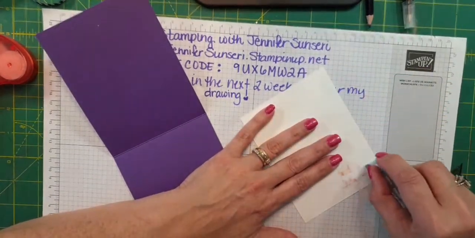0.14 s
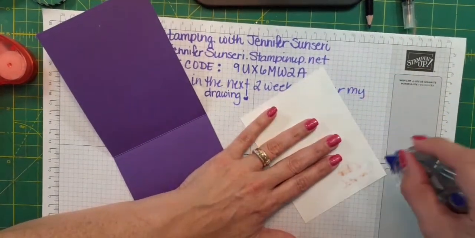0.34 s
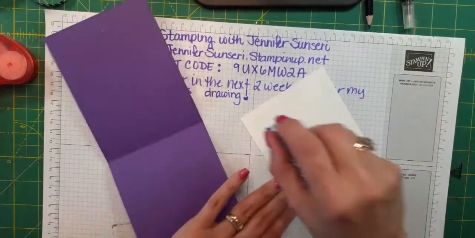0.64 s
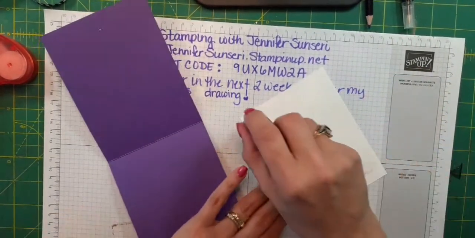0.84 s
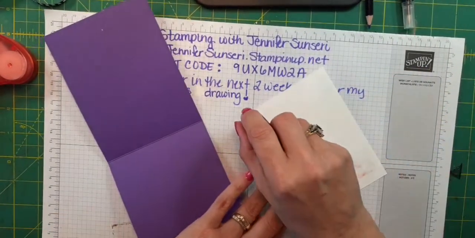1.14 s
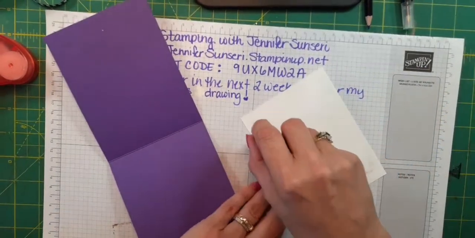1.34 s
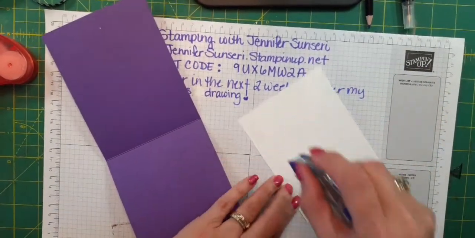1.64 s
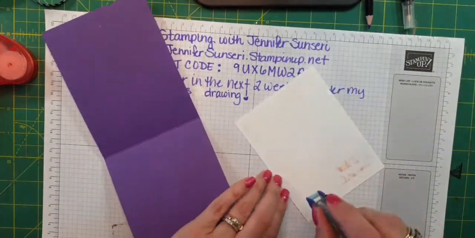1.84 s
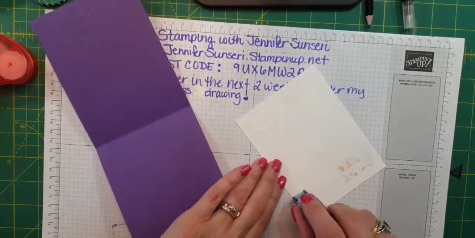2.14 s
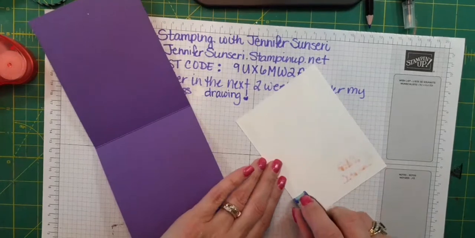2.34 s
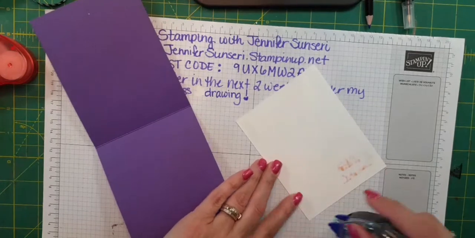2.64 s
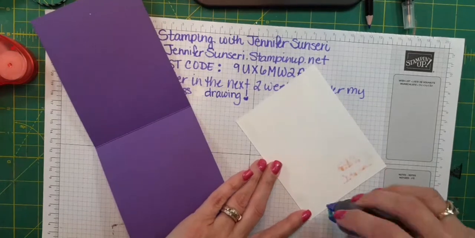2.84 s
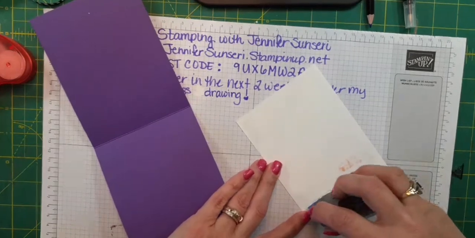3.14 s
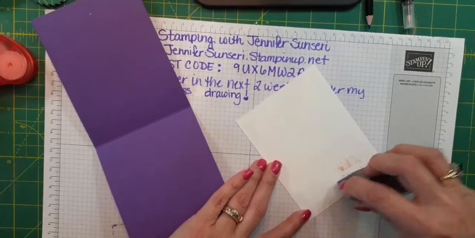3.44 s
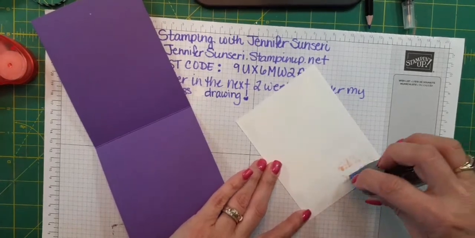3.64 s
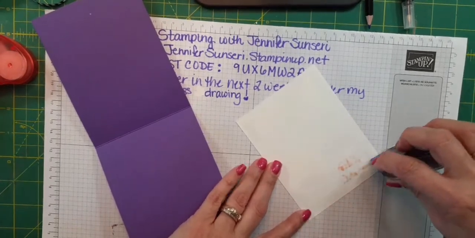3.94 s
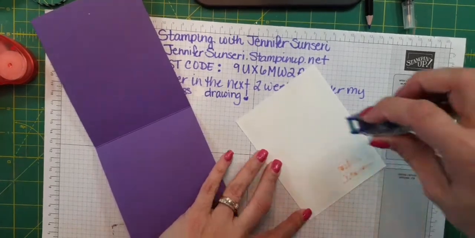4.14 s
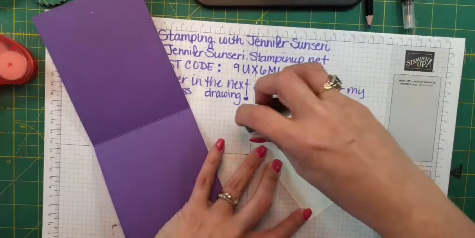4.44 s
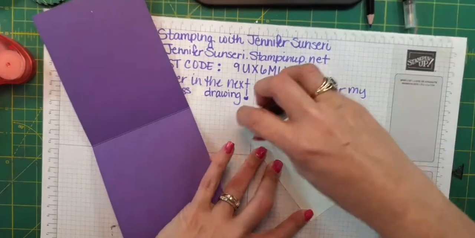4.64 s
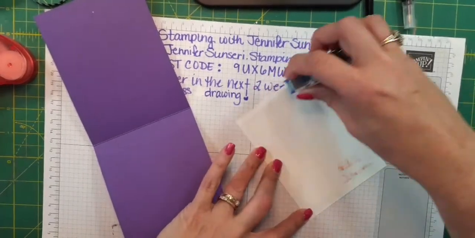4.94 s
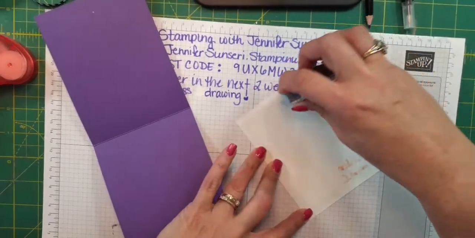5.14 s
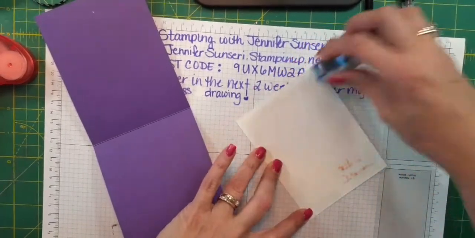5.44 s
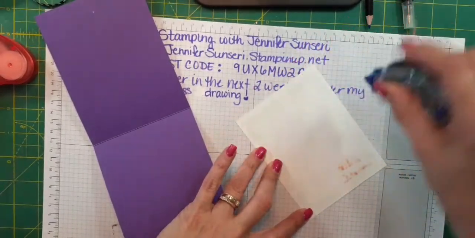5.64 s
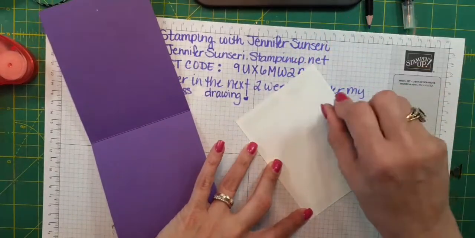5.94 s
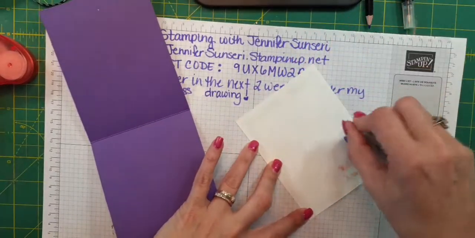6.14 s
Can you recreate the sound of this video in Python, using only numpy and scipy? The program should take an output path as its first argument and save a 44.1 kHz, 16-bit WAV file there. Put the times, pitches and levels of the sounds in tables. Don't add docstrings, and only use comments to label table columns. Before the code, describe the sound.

Quick rattling bursts of tiny plastic teeth, each about a tenth of a second, repeat eight times as a tape tool is dragged over card. Single bright snaps and papery scuffs fill the gaps; later strokes are preceded by clattery little knocks and dull desk thuds. The stereo microphones are close, with tight reflections off the tabletop and little room tail, over soft air noise and a low motor hum.

```python
import sys
import numpy as np
from scipy import signal
from scipy.fft import rfft, irfft
from scipy.io import wavfile
from scipy.ndimage import uniform_filter1d

SR = 44100
rng = np.random.default_rng(int(sys.argv[2]) if len(sys.argv) > 2 else 0)


def log_audio(samples):
    frames = np.atleast_2d(samples).T
    limited = np.clip(frames, -1, 1)
    pcm = np.round(limited * 32767).astype(np.int16)
    wavfile.write(sys.argv[1], SR, pcm)


def amplitude_ratio(level_db):
    exponent = np.asarray(level_db, float) / 20
    return 10 ** exponent


N = 277389


def steep(x, hz, kind):
    return signal.sosfilt(signal.butter(3, hz, kind, fs=SR, output="sos"), x)


def rms_one(x):
    return x / np.sqrt(np.mean(x ** 2) + 1e-20)


def at_hz(points, hz):
    point_hz, value = np.array(points).T
    return np.interp(np.log(hz + 1), np.log(point_hz), value)


def wander(per_s):
    return np.interp(np.arange(N) / SR * per_s, np.arange(400), rng.standard_normal(400))


def body(x, modes):
    out, power = 0, 0
    for k, (hz, width_hz, db) in enumerate(modes):
        r = np.exp(-np.pi * width_hz / SR)
        a = [1, -2 * r * np.cos(2 * np.pi * hz / SR), r * r]
        b = np.array([1, 0, -1]) * (1 - r * r) / 2
        out = out + (-1) ** k * amplitude_ratio(db) * signal.lfilter(b, a, x + 1e-18)
        power += amplitude_ratio(db) ** 2 * (1 - r * r) / 2
    return out / np.sqrt(power)


# time_s, lead_samples
PORT_LEAD = [(0, 4), (1, -2), (4.7, -1), (5.1, 3)]


def pair(alike, spread_db):
    grain_db = spread_db * np.minimum(rng.exponential(1, N), 3)
    shared, *own = rng.standard_normal((3, N)) * amplitude_ratio(grain_db)
    alike = np.clip(alike, 0, 1)
    n = np.arange(N)
    lead = np.round(np.interp(n / SR, *np.transpose(PORT_LEAD))).astype(int)
    shifted = shared[np.clip(n + lead, 0, N - 1)]
    return rms_one(np.sqrt(alike) * np.array([shared, shifted]) + np.sqrt(1 - alike) * np.array(own))


def crackle(alike, modes, even_s):
    x = body(pair(alike, 0.3), modes)
    return x / np.sqrt(uniform_filter1d(x ** 2, int(even_s * SR)) + 1e-3)


def bursts(s, db, pan_db, rise_s, fall_s):
    marks = np.zeros((2, N))
    at = np.round(s * SR).astype(int)
    np.add.at(marks, (slice(None), at), amplitude_ratio(db + np.outer([0.5, -0.5], pan_db)))
    for tau in (rise_s, fall_s):
        marks = signal.lfilter([1], [1, -np.exp(-1 / (tau * SR))], marks + 1e-18)
    return marks / (rise_s * SR)


# freq_hz, density_db_per_hz
AIR_SPECTRUM = [(20, -50), (40, -71), (80, -18.5), (150, -21), (220, -19.5), (320, -29.5), (600, -31),
                (800, -42), (1250, -37), (2000, -47), (3500, -53.5), (7000, -55), (9500, -61.5),
                (14000, -54.5)]
# centre_hz, width_hz, level_db
DUCT_LINES = [(59, 7.4, -75), (104.3, 33, -61.5), (136.3, 107, -57)]
# freq_hz, likeness_0_to_1
AIR_LIKENESS = [(100, 0.91), (300, 0.77), (700, 0.19), (1500, 0), (5000, 0.012)]


def air():
    hz = np.arange(N // 2 + 1) * SR / N
    mid, side = rfft(rng.standard_normal((2, N)))
    broad = amplitude_ratio(at_hz(AIR_SPECTRUM, hz))
    power = (broad / np.sqrt(np.mean(broad ** 2)) * amplitude_ratio(-60.5)) ** 2
    for centre_hz, width_hz, db in DUCT_LINES:
        line = 1 / (1 + (2 * (hz - centre_hz) / width_hz) ** 2) ** 2
        power = power + line / np.mean(line) * amplitude_ratio(db) ** 2
    alike = np.clip(at_hz(AIR_LIKENESS, hz), 0, 1)
    both = np.sqrt((1 + alike) / 2) * mid + np.sqrt((1 - alike) / 2) * side * [[1], [-1]]
    return irfft(both * np.sqrt(power), N) * amplitude_ratio([[0.7], [-0.7]])


# time_s, level_db
AIR_FLOW = [
    (0, 4),
    (.35, -12),
    (.6, 0.5),
    (1.2, 0.5),
    (2.3, 1),
    (2.6, -1),
    (4, 2.5),
    (4.5, -4),
    (5.4, -5),
    (6.29, 2),
]


def drone():
    motor_hz, motor_db = 120, -52.5
    duct_hz, duct_width_hz, duct_db = 126, 20, -52.5
    t = np.arange(N) / SR
    duct = body(rng.standard_normal(N + SR), [(duct_hz, duct_width_hz, 0)])
    duct = body(duct, [(duct_hz, 1.01 * duct_width_hz, 0)])
    duct = rms_one(duct[SR:])
    motor = amplitude_ratio(motor_db) * np.sin(2 * np.pi * motor_hz * t)
    flow_db = np.interp(t, *np.transpose(AIR_FLOW))
    return (motor + amplitude_ratio(duct_db) * duct) * amplitude_ratio(flow_db + [[0.7], [-0.7]])


# start_s, level_db
LANDINGS = [
    (2.149, -55),
    (3.04, -51),
    (3.627, -49),
    (4.441, -52.5),
    (5.055, -46.5),
    (5.959, -50.5),
]
# freq_hz, level_db, t60_s
DESK_TOP_MODES = [(50.1, 4.5, .4), (119, 6.5, 0.32), (275, 0, 0.19)]


def thumps():
    t, out = np.arange(N) / SR, np.zeros(N)
    for s, db in LANDINGS:
        u = np.clip(t - s, 0, None)
        for hz, mode_db, t60_s in DESK_TOP_MODES:
            swing = np.sin(2 * np.pi * hz * u) * (1 - np.exp(-u * hz / 2))
            out += amplitude_ratio(db + mode_db - 60 * u / t60_s) * swing
    return out


# start_s, length_s, centre_hz, mid_db, fizz_db
SLIDES = [(0.111, 0.07, 5000, -70, -66), (0.168, 0.35, 5000, -74.5, -86), (0.326, 0.061, 6500, -70.5, -66),
          (0.4, 0.079, 7100, -65, -69), (0.673, 0.076, 5750, -79.5, -94), (1.318, 0.085, 6000, -73, -67),
          (1.545, 0.1, 6050, -74, -72), (1.764, 0.22, 5960, -79, -87), (1.907, 0.052, 6500, -76, -89),
          (2.62, 0.14, 2150, -72.5, -81), (2.644, 0.17, 4030, -72, -79), (2.819, .08, 5200, -74.5, -89),
          (3.03, 0.095, 2950, -79, -81), (3.61, 0.36, 2900, -69.5, -75), (3.86, 0.13, 5000, -69.5, -75),
          (3.94, 0.23, 5200, -76.5, -94), (5.365, 0.082, 3270, -74.5, -81),
          (5.494, 0.059, 2370, -66.5, -69), (5.569, 0.079, 3020, -68.5, -66), (5.861, 0.1, 2750, -60, -89),
          (6.106, 0.12, 6000, -87, -95), (6.251, .045, 6500, -77.5, -89)]
# freq_hz, width_hz, level_db
FIZZ_MODES = [(11610, 3430, -4.5), (12600, 1500, 1.5), (14350, 1600, -3.5)]


def rustle():
    out, catch = np.zeros((2, N)), amplitude_ratio(4.3 * wander(60))
    grain = catch * pair(0.28, 2.0)
    fizz = catch * steep(body(pair(0.42, 3.2), FIZZ_MODES), 7800, "high")
    for s, length_s, hz, mid_db, fizz_db in SLIDES:
        now = slice(round(s * SR), min(N, round((s + 1.46 * length_s) * SR)))
        along = np.linspace(0, 1, now.stop - now.start)
        swell = np.sin(np.pi * along ** 0.52) ** 1.47
        mid = body(grain[:, now], [(hz, 0.64 * hz, 0), (6.0 * hz, 1.11 * hz, -12.0)])
        mid = steep(mid, min(2.2 * hz, 16000), "low")
        out[:, now] += swell * (amplitude_ratio(mid_db + 3.0) * mid + amplitude_ratio(fizz_db + 6.5) * fizz[:, now])
    return out


# start_s, snap_db, shell_rel_db
NOSE_KNOCKS = [(3.04, -60.5, 7), (3.619, -68.5, 14.5), (3.633, -56, 6), (4.433, -63.5, 14),
               (4.441, -45.5, 9), (4.453, -41.5, 8.5), (4.538, -51.5, 11.5), (4.551, -46, 2),
               (5.057, -58, 14.5), (5.063, -46.5, 9), (5.07, -41, 8.5), (5.083, -49, 9), (5.109, -55.5, 15),
               (5.117, -47.5, 1), (5.469, -71, 3), (5.791, -58.5, 10), (5.801, -48, -2), (5.812, -45.5, 0),
               (5.823, -46, 8), (5.877, -52.5, 10), (5.89, -51.5, 8.5)]
# start_s, snap_db, fizz_rel_db, strongest_ring_hz
BRIGHT_FLICKS = [(0.052, -44, -4, 4500), (0.568, -65, -12, 5370), (1.264, -43, -13, 4300),
                 (1.317, -64, 9, 4900), (2.149, -65.5, 1, 3650), (2.261, -46, -3, 4500),
                 (2.539, -60.5, -5, 5440), (2.6, -69, -6, 5200), (2.65, -70, -11, 4400),
                 (2.675, -50, -5, 3600), (2.759, -56, -23, 3700), (3.3028, -36, 5, 4860),
                 (3.348, -51.5, 2, 3500), (3.926, -45.5, 7, 7700), (3.942, -42, 1, 7350),
                 (4.043, -69, 3, 4400), (4.093, -71, -7, 6250), (4.781, -51, 3.5, 6000),
                 (4.794, -57, 3, 5200), (5.337, -44, -10, 4300), (5.354, -44.5, -9, 2950),
                 (5.392, -55, -11, 3070), (5.494, -59, -1, 4630), (5.586, -52, 2, 2900),
                 (6.032, -36, -13, 4500), (6.138, -62.5, -9, 7150)]


def ticks():
    knocks = [(s, db, shell_db - 3.5, -16.5, 0, -2.5, 2770) for s, db, shell_db in NOSE_KNOCKS]
    flicks = [(s, db, -10, fizz_db - 1.0, -0.5, -3.5, hz) for s, db, fizz_db, hz in BRIGHT_FLICKS]
    return np.array(knocks + flicks)


# first_tooth_s, last_tooth_s, start_extra_wait_0_to_2, stop_extra_wait_0_to_2, snap_db
STROKES_RUN = [
    (0.0024, 0.087, 0, 1.47, -29.5),
    (1.0846, 1.2414, 0.85, 0.43, -29.5),
    (2.2444, 2.3748, 1.06, 0.8, -30),
    (3.1473, 3.2706, 1.13, 0.45, -32),
    (3.6989, 3.7953, 0.76, 1.82, -30.5),
    (4.5667, 4.684, .7, 1.66, -31),
    (5.1253, 5.2036, 0.64, 0.47, -30.5),
    (5.91, 6.041, 0.53, 1.14, -30.5),
]
TEETH_COUNT = [6, 11, 9, 13, 13, 17, 12, 12]
# shell_rel_db, fizz_rel_db, desk_rel_db, left_right_db
HAND_GRIP = [(-13, -0.5, -7.5, -0.5), (-12, -3.5, -10, 0.5), (-8, -4, -13, 0), (-7, 1, -3.5, -.5),
             (-6, 1, -2.5, -1.5), (-3, 0.5, -5.5, 0), (1, -0.5, -4.5, 0), (-12.5, -1, -10.5, 1)]
# snap_db, shell_db, fizz_db, left_right_db
TOOL_TIPPING = [(2, -13, 0, -2.5), (6, 1, 0.5, 3), (-5, 8.5, 5, -0.5), (-3.5, -15.5, -3.5, -1.5),
                (-1.5, 0.5, 9.5, 2), (2.5, -5, -3, 0), (-3, -7.5, 13, -1.5), (-0.5, -5, 5.5, 0)]
TREBLE_LEAN = [(3.5, -4.5), (-2.5, 2.5), (2, -10.5), (3.5, -11), (-1, -6), (3.5, 1.5), (-1.5, -1), (0, 7.5)]


def teeth():
    speed_up_teeth, slow_down_teeth, slip_s = 1.17, 1.05, 0.00039
    rows = []
    strokes = zip(STROKES_RUN, TEETH_COUNT, HAND_GRIP, TOOL_TIPPING, TREBLE_LEAN)
    for (first_s, last_s, start, stop, db), count, grip, tip, lean in strokes:
        k, luck = np.arange(count), rng.standard_normal((count, 4))
        waits = 1 + start * np.exp(-k[:-1] / speed_up_teeth) + stop * np.exp(-k[-2::-1] / slow_down_teeth)
        s = first_s + (last_s - first_s) * np.append(0, np.cumsum(waits)) / waits.sum()
        along = k / (count - 1) - 0.5
        s = s + slip_s * luck[:, 0] * (abs(along) < 0.5)
        shorter_wait = np.minimum(np.append(waits[0], waits), np.append(waits, waits[-1]))
        speed = -np.log2(shorter_wait)
        snap_db = db + 1.5 * speed + tip[0] * along + 0.52 * luck[:, 1]
        snap_db = snap_db - 8.5 * start * np.exp(-k / 1.1)
        shell_db = grip[0] + tip[1] * along + 1.5 * luck[:, 2]
        fizz_db = grip[1] + tip[2] * along + 0.5 * speed
        pan_db = grip[3] + tip[3] * along + 0.89 * luck[:, 3]
        rows += zip(s, snap_db, shell_db, fizz_db, pan_db, grip[2] + 0 * k, lean[0] + lean[1] * along)
    return np.array(rows)


# freq_hz, width_hz, level_db
SHELL_MODES = [(1177, 83, -8), (1360, 84, -11.5), (1464, 85, -1), (1762, 370, -1.5), (2116, 120, -7.5),
               (2750, 120, -12.5)]
# hollow_mode_db, tilt_db_per_octave
PALM_HOLD = [(0.5, -3), (5.5, 2.5), (2.5, 4), (-2.5, -4.5), (-4, 3), (-9, -3), (-3.5, -2), (3, 7), (-3, -4)]


def shell_ring(s, db, pan_db):
    hollow_hz, hollow_mode = 1470, 2
    in_strokes = np.repeat(PALM_HOLD[:-1], TEETH_COUNT, axis=0)
    between = np.tile(PALM_HOLD[-1], (len(s) - sum(TEETH_COUNT), 1))
    hollow_db, tilt_db = np.vstack([in_strokes, between]).T
    luck, out = rng.standard_normal((len(s), len(SHELL_MODES))), 0
    for k, (hz, width_hz, mode_db) in enumerate(SHELL_MODES):
        hand_db = hollow_db * (k == hollow_mode) + tilt_db * np.log2(hz / hollow_hz) + 1.86 * luck[:, k]
        swell = bursts(s - 0.0003, db + mode_db + hand_db - 12.5, pan_db, 0.0012, 0.0016)
        struck = crackle(0.88, [(hz, width_hz, 0)], 0.009) * swell
        out = out + body(struck, [(hz, 3.0 * width_hz, 0)])
    return steep(out, [980, 3200], "band")


# freq_hz, width_hz, level_db
CARTRIDGE_MODES = [(2900, 560, 0.5), (4390, 1200, 0.5), (5200, 7100, -10), (6500, 980, 1),
                   (7860, 380, -8.5)]


def cartridge_snap(s, db, pan_db, lean_db, tick_hz):
    luck, out = rng.standard_normal((len(s), len(CARTRIDGE_MODES))), 0
    first_tick = len(s) - len(tick_hz)
    for k, (hz, width_hz, mode_db) in enumerate(CARTRIDGE_MODES):
        colour_db = lean_db * np.log2(hz / 4500) + 2.0 * luck[:, k]
        colour_db[first_tick:] = 5.0 - 9.0 * abs(np.log2(hz / tick_hz))
        swell = bursts(s, db + mode_db + colour_db + 0.091, pan_db, 0.0013, 0.0015)
        out = out + steep(crackle(0.17, [(hz, width_hz, 0)], 0.0008) * swell, 1.52 * hz, "low")
    return steep(out, 1300, "high")


def tape_fizz(s, db, pan_db):
    fizz = crackle(0.18, FIZZ_MODES, 0.00026) * bursts(s, db + 7.0, pan_db, 0.00069, 0.0011)
    return steep(fizz, 6400, "high")


# freq_hz, width_hz, level_db
DESK_MODES = [(267, 16, 4), (430, 434, -1.5), (557, 140, 3.5), (864, 2700, -5.5)]


def desk_sound(s, db):
    push = pair(0.67, 0.7) * bursts(s, db, 0 * s, 0.0042, 0.0024)
    return steep(body(push, DESK_MODES), 1900, "low")


def runner():
    pawl, other = teeth(), ticks()
    s, db, shell_db, fizz_db, pan_db, desk_db, lean_db = np.vstack([pawl, other]).T
    s = s - 0.0004
    snap = cartridge_snap(s, db, pan_db, lean_db, other[:, -1])
    fizz = tape_fizz(s, db + fizz_db, pan_db)
    shell = shell_ring(s, db + shell_db + 2.0, pan_db)
    return snap + fizz, shell, desk_sound(s, db + desk_db)


def room(x):
    early_t60_s, early_db, late_t60_s, late_db = 0.077, -2, 0.25, -15
    t = np.arange(SR // 2) / SR
    early, late = rng.standard_normal((2, 2, len(t)))
    early = early * amplitude_ratio(-60 * t / early_t60_s) * np.clip(t / 0.0022, 0, 1)
    late = signal.lfilter([1], [1, -0.3], late) * amplitude_ratio(-60 * t / late_t60_s) * np.clip(t / 0.014, 0, 1)
    answer = amplitude_ratio(early_db) * early / np.linalg.norm(early[0])
    answer = answer + amplitude_ratio(late_db) * late / np.linalg.norm(late[0])
    return signal.fftconvolve(x, answer, axes=1)[:, :N]


def scene():
    tool, shell, desk = runner()
    background = air() + drone() + thumps() + rustle()
    return background + amplitude_ratio(1.0) * desk + tool + shell + room(tool + amplitude_ratio(-1.0) * shell)


def band_limit(x):
    return signal.sosfilt(signal.butter(12, 16680, fs=SR, output="sos"), x)


def record(dry):
    top_hz = 15620
    mix = steep(dry, 30, "high")
    mix = signal.sosfilt(signal.cheby2(24, 40, top_hz, fs=SR, output="sos"), mix)
    return band_limit(mix)


dry = scene()
out = record(dry)
log_audio(out)
```